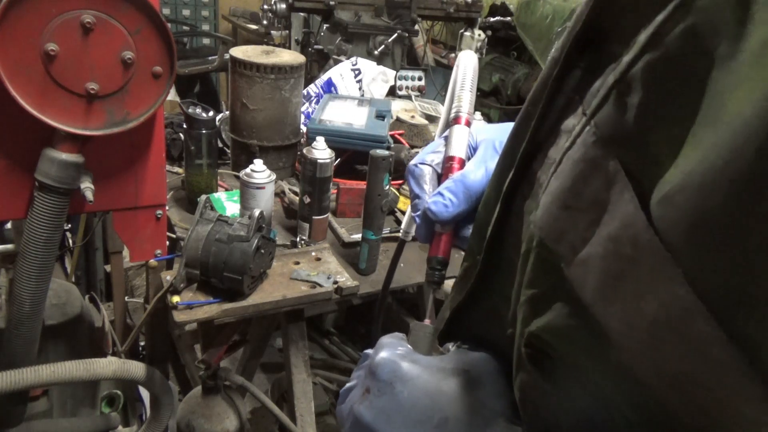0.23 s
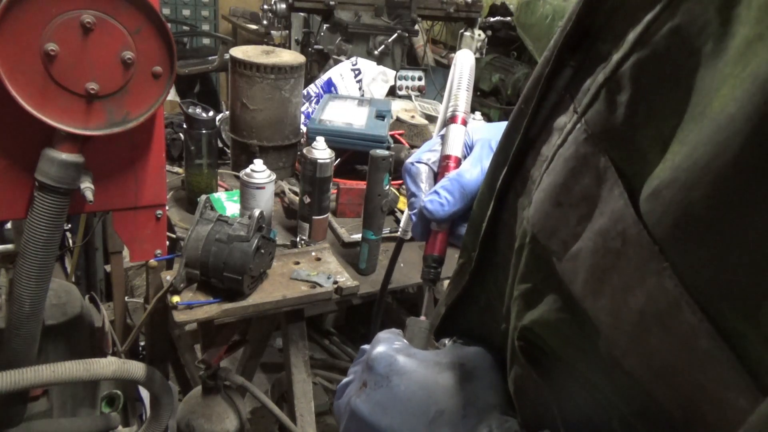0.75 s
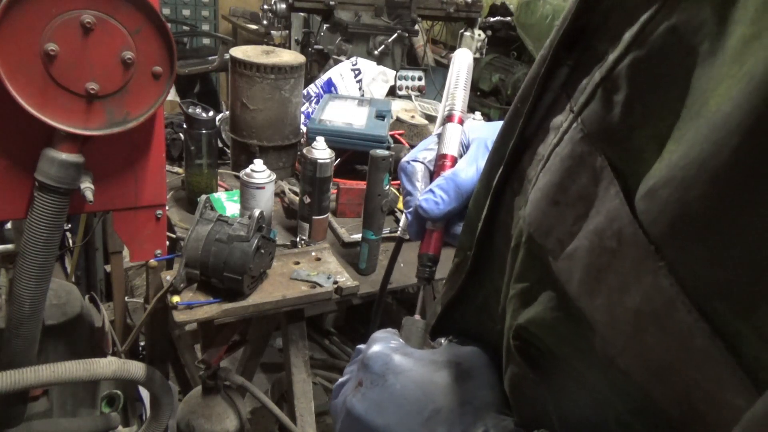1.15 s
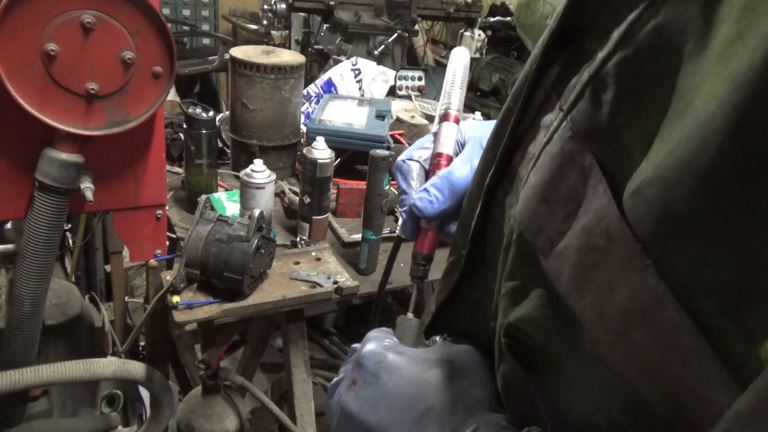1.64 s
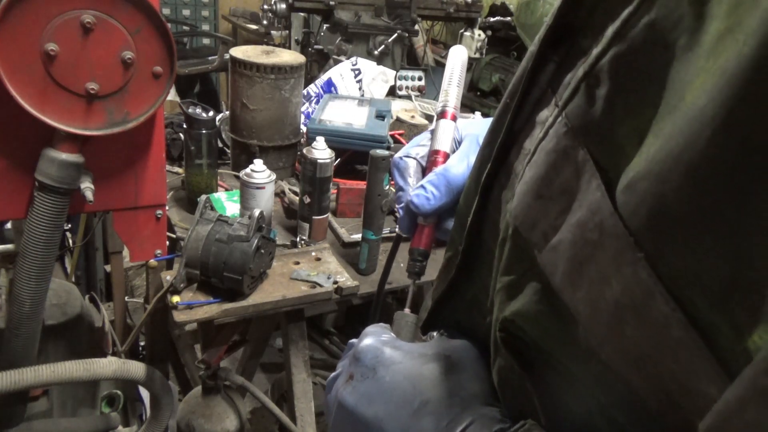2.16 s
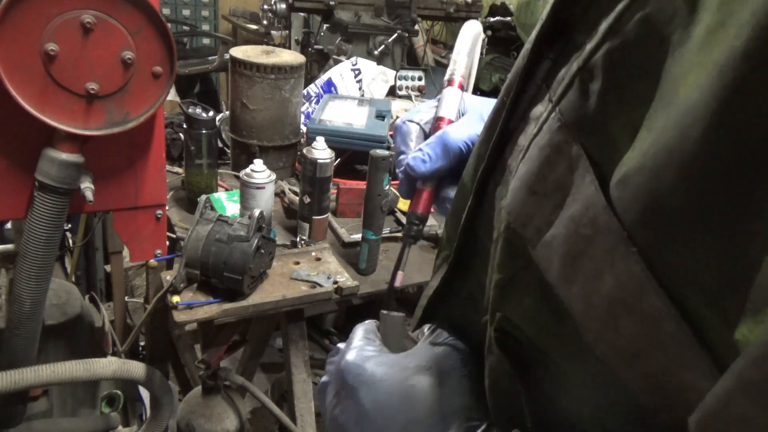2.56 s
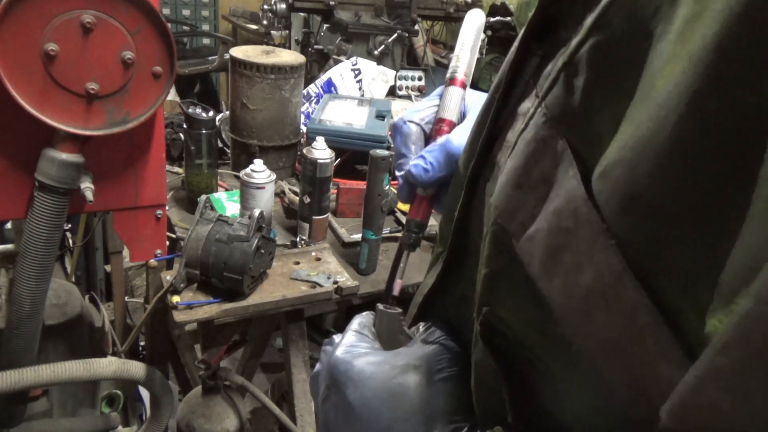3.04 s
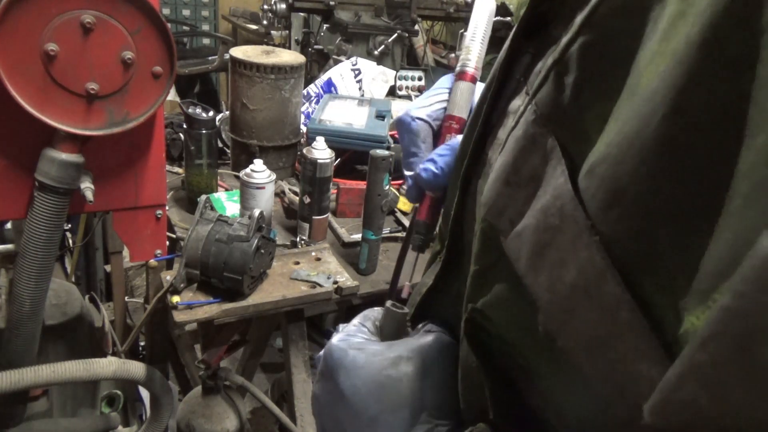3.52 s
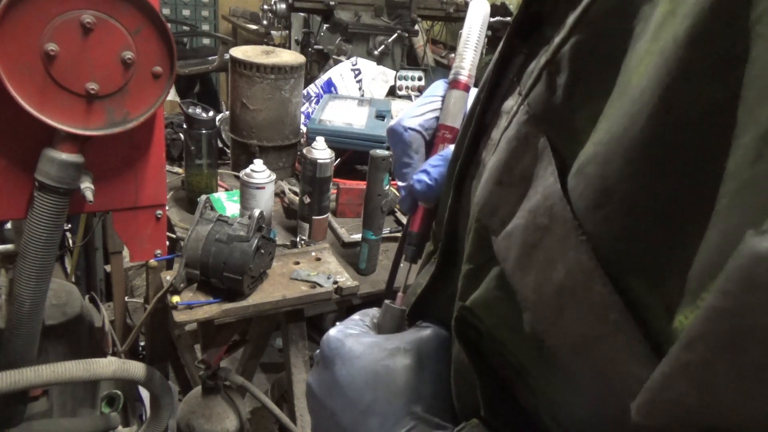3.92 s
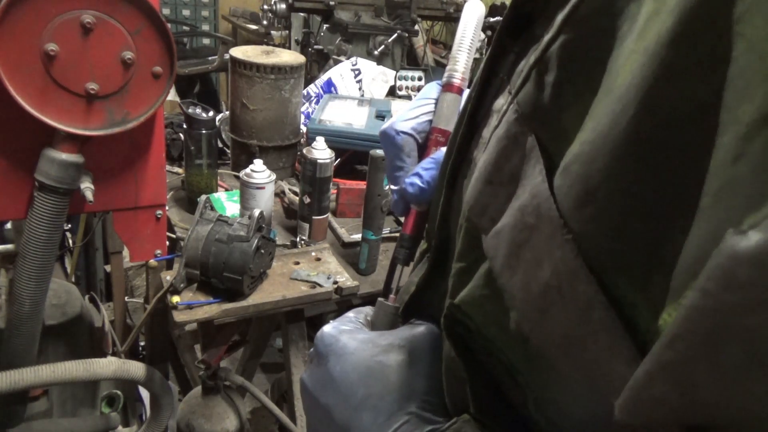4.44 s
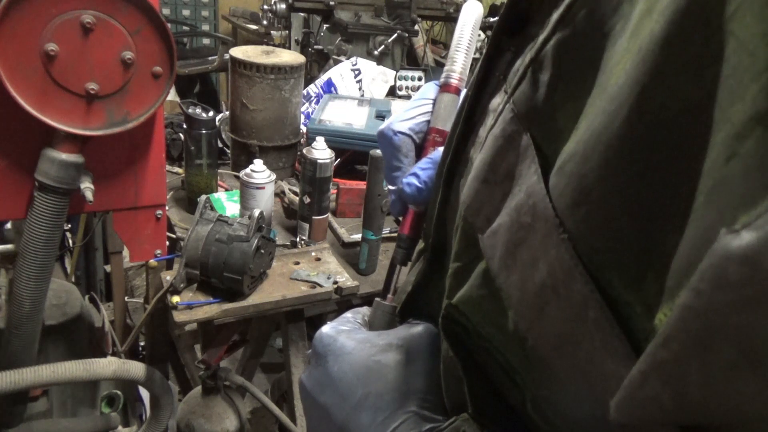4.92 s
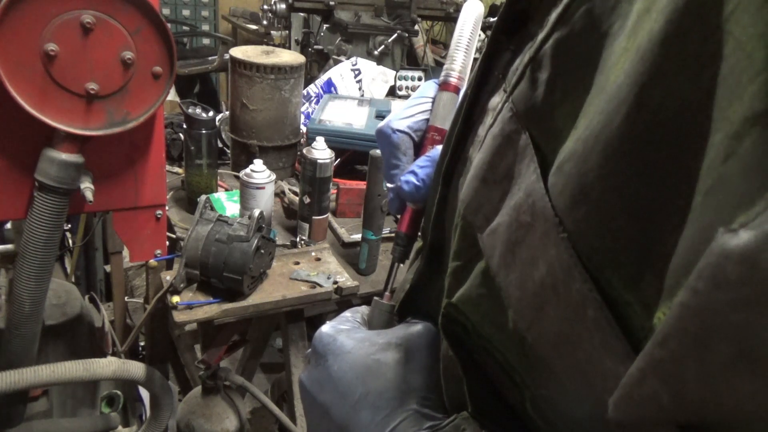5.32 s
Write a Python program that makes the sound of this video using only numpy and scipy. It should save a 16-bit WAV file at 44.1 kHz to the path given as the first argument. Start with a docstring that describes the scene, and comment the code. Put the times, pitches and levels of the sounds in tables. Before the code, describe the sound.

Close, piercing whine of a pneumatic hand grinder with airy hiss, rough squeals under load, a clean whistling spell, then more grinding.

```python
"""A hand-held air-powered grinder spins at about 37000 turns a minute, over a faint workshop rumble.
At first its burr is pressed on a small metal part: the shaft hum sags under load, the part squeals in bursts.
From about 2.3 s the burr is lifted and a bearing tone whistles; at 4 s it is pressed on again, until the end.
Throughout, shaft and bearing tones follow the speed, filtered noise makes the air hiss, the bearings scream
near 8 kHz, and a limiter holds the peaks."""
import sys
import numpy as np
from scipy import signal
from scipy.fft import rfft, irfft, next_fast_len
from scipy.io import wavfile
from scipy.ndimage import uniform_filter1d, minimum_filter1d

SR = 44100
rng = np.random.default_rng(int(sys.argv[2]) if len(sys.argv) > 2 else 0)


def to_wav(s):
    """Save 16-bit WAV."""
    ch = np.atleast_2d(s).T  # columns
    pcm = np.round(np.clip(ch, -1, 1) * 32767)  # PCM
    wavfile.write(sys.argv[1], SR, pcm.astype(np.int16))


N = 245637

# In these tables "free", "first cut" and "second cut" are three settings that blend as the burr bites.
# Levels are starting levels: load, wander and the level control of the treble act on them later.

# noise of the shop: (frequency [Hz], relative level [dB per Hz])
RUMBLE_COLOUR = [(25, -25), (60, -5.5), (130, -5), (240, 2), (320, 0), (430, -4.5), (560, -0.5), (730, -42)]
# the low background swells a little: (time [s], level [dB])
RUMBLE_SWELL = [(0, -57), (2.2, -57), (2.85, -54.8), (3.2, -56.6), (5.57, -56.5)]
# the tool drifts towards the middle: (time [s], share of the left-right difference [0-1])
OFF_CENTRE = [(0, .29), (2.9, .32), (4.1, .16), (5.57, .1)]
# left-right balance of the tool at full share: (frequency [Hz], left minus right [dB])
BALANCE = [(200, 0), (650, 2), (1290, 0), (2380, -3), (4400, -1.5), (8100, -4), (15000, -.5)]

# spindle speed, which sags with the pressure of the hand: (time [s], speed [turns per s])
SPEED = [(0.05, 629.1), (0.44, 627.0), (0.52, 619.8), (0.84, 620.9), (0.9, 613.5), (0.97, 619.1),
         (1.11, 606.1), (1.17, 605.4), (1.2, 620.7), (1.25, 628.7), (1.72, 609.9), (1.86, 618.8),
         (2.2, 609.8), (2.31, 621.1), (2.39, 637.0), (4.03, 637.4), (4.12, 627.8), (4.42, 611.6),
         (4.54, 616.2), (4.8, 597.9), (4.85, 608.8), (5.0, 607.3), (5.03, 613.1), (5.5, 597.9)]
FREE_TURNS_PER_S = 637
LOAD_SAG_PERCENT = 3.76   # the load nears its full value beyond this loss of speed
# the burr is pressed on the part: (start [s], length [s], time to bite [s])
CUTS = [(-0.1, 2.372, .05), (4.002, 1.7, .1)]
LIFT_S = 0.055   # the burr leaves the metal this quickly
# the burr skates over the metal and its buzz changes: (start [s], length [s], depth [0-1])
SKATES = [(-.05, 0.27, 0.8), (0.53, 0.043, 0.1), (0.974, .05, 0.05), (1.36, 0.067, 0.3), (4.27, 0.18, 0.98),
          (4.495, 0.12, 1), (4.686, 0.12, 0.57), (4.96, 0.043, .8), (5.2, .16, 0.52)]
SKATE_EDGE_S = 0.045
# the burr briefly skips off the metal: middle of the skip and about half its length
SKIP_S, SKIP_HALF_LENGTH_S = 1.21, 0.022

# air and grinding hiss, coloured by the tool's resonances:
# (frequency [Hz], free [dB per Hz], first cut [dB per Hz], second cut [dB per Hz])
HISS = [(800, -87, -90, -94), (1300, -84, -81, -82), (2200, -83, -84, -84), (3100, -80, -76, -80),
        (4000, -82, -81, -82), (5800, -77, -79, -78), (6800, -69, -69, -67), (7700, -52, -51, -50),
        (8500, -64, -60, -58), (9300, -69, -67, -69), (10100, -59, -57, -61), (11300, -64, -63, -64),
        (12200, -73, -64, -67), (13100, -65, -66, -73), (14200, -74, -72, -77), (15400, -77, -75, -77)]
# rise and fall of the hiss: (time [s], gain [dB])
AIR = [(0, 3), (.5, 1), (1.1, 2), (1.9, 1.5), (2.5, 2.5), (2.87, 4), (3.55, -0.1), (4.2, 1), (4.65, 2.5),
       (5.2, 0.5), (5.57, 4.5)]
# ball and cage tones, mostly between the whole multiples:
# (multiple of the speed, free [dB], first cut [dB], second cut [dB])
BEARING = [(2.115, -47, -50, -52), (4.46, -56, -62, -75), (8.67, -49, -53, -57), (10.03, -42, -57, -49),
           (11.42, -39, -44, -52), (11.64, -33, -42, -43), (11.83, -30, -39, -40), (12.2, -30, -28, -34),
           (12.42, -28, -26, -26), (12.64, -35, -32, -28), (12.81, -30, -24, -25), (13.03, -32, -39, -34),
           (13.19, -41, -36, -35), (13.42, -38, -35, -32), (13.8, -51, -46, -39), (14.16, -47, -39, -39),
           (15.33, -39, -60, -62), (15.56, -33, -44, -52), (15.78, -35, -39, -42), (15.94, -39, -42, -43),
           (16.17, -33, -28, -29), (16.34, -44, -37, -35), (16.56, -40, -36, -41), (16.78, -44, -37, -41),
           (17.17, -45, -41, -45), (17.56, -39, -40, -47), (17.78, -40, -40, -46), (18.17, -40, -34, -38),
           (18.35, -51, -44, -46), (19.8, -55, -47, -55), (20.17, -58, -44, -49), (20.32, -38, -39, -52),
           (20.7, -40, -44, -52), (21.12, -41, -42, -45), (21.7, -48, -52, -51)]
# one bearing tone sits on the tool's main resonance and whistles: (start [s], length [s], level [dB])
WHISTLES = [(2.36, 0.46, -23), (2.98, 1.18, -18.5), (3.6, 0.215, -13.5)]
WHISTLE_MULTIPLE, WHISTLE_IDLE_DB = 12.03, -29
WHISTLE_ATTACK_S, WHISTLE_RELEASE_S = 0.036, 0.037
# higher multiples of the speed: (multiple of the speed, free [dB], first cut [dB], second cut [dB])
OVERTONES = [(7, -56, -48, -50), (8, -52, -45, -47), (9, -51, -52, -48), (10, -54, -49, -41),
             (11, -37, -43, -40), (13, -44, -31, -26), (14, -44, -35, -30), (15, -48, -42, -39),
             (16, -51, -34, -35), (17, -42, -34, -39), (18, -44, -33, -35), (19, -55, -37, -38),
             (20, -42, -35, -42), (21, -48, -37, -41), (22, -60, -46, -47), (23, -58, -48, -46)]

# the caught burr bounces on the part: (start [s], length [s], strength of each knock [dB])
CATCHES = [(.535, .026, -30), (4.62, .007, -26)]
# ringing of the part, damped by the glove: (frequency [Hz], width [Hz], relative level [dB])
PART_MODES = [(1540, 250, -1), (3100, 500, 0), (4300, 900, -4)]
# unbalance and tooth strikes: (multiple of the speed, free [dB], first cut [dB], second cut [dB],
# change at full load [dB], change in a full skate [dB], wander in the cut [dB], roughness [0-1])
SHAFT_TONES = [(1, -37, -32, -31.5, -10, 1, 0.2, 0.17), (2, -43.5, -38, -36, 6.5, -2, 1.5, 0.19),
               (3, -46, -51, -48, 10.5, -12.5, 3, 0.28), (4, -59, -43, -37, -5.5, -10, 2.5, 0.29),
               (6, -42.5, -41, -40.5, 1.5, -2, 0.8, 0.37)]
# the fifth multiple meets a resonance of the part: (start [s], length [s], level [dB], roughness [0-1])
SQUEALS = [(-0.02, 0.33, -27, 0.1), (0.233, 0.054, -24, 0.3), (0.293, 0.1, -35.5, 0.2),
           (0.47, 0.063, -28, 0.3), (0.815, 0.064, -31, 0.4), (1.04, 0.2, -33, 0.72),
           (1.272, 0.043, -24, 0.2), (1.309, 0.066, -31, 0.2), (1.688, 0.028, -33, 0.86),
           (1.813, 0.11, -33.5, 0.63), (2.133, 0.035, -31, 0.4), (2.266, 0.024, -29, 0.1),
           (4, 0.094, -32, 0), (4.42, 0.062, -41, .3), (4.61, 0.073, -35, .8), (4.742, 0.15, -42, 0.9),
           (5.337, 0.12, -40, 0.2), (5.491, 0.032, -31.5, 0)]
SQUEAL_ATTACK_S, SQUEAL_RELEASE_S = 0.018, 0.036
# steady fifth multiple under the squeals: (free [dB], first cut [dB], second cut [dB])
SQUEAL_IDLE = [-61, -40.5, -48.5]
# a squeal drags other multiples along: (multiple of the speed, level relative to the squeal [dB])
SQUEAL_PARTNERS = [(7, -24), (8, -23)]
SQUEAL_FOURTH_DB = -16   # what a squeal adds to the fourth multiple, relative to the squeal

# the scream near 8 kHz, before the whistle adds to it: (free [dB], first cut [dB], second cut [dB])
SCREAM = [-17.5, -17, -15.5]
# treble above the scream, before a final lift of 2 dB: (time [s], level [dB])
RASP = [(0, -20), (.9, -23.5), (1.55, -22), (1.9, -20.5), (2.3, -22), (2.65, -25.5), (2.95, -24.5),
        (3.4, -25), (4.05, -26.5), (4.3, -23), (4.9, -25), (5.57, -25)]
SCREAM_LOW_HZ, RASP_LOW_HZ = 6500, 9200   # where the scream and the treble above it begin
# the hum, everything of the low tones below HUM_TOP_HZ, dips for a while as the tool runs free
HUM_DIP_S, HUM_DIP_LENGTH_S, HUM_DIP_EDGE_S, HUM_DIP_DB, HUM_TOP_HZ = 3.39, 0.686, 0.069, -4.5, 1600
CUTOFF_HZ = 15750   # nothing is heard above this


def from_db(db):
    """Turn decibels into a gain."""
    return 10 ** (np.asarray(db) / 20)


def rms_one(x):
    """Scale to an average (rms) strength of 1."""
    return x / np.sqrt(np.mean(x ** 2) + 1e-20)


def in_time(rows):
    """Join the points of a table that starts with time: one curve for each further column."""
    s, *columns = np.transpose(rows)
    return [np.interp(np.arange(N) / SR, s, column) for column in columns]


def at_hz(points, hz, column=1):
    """Read a table of frequencies, with pitch spaced evenly as the ear hears it."""
    points = np.array(points)
    return np.interp(np.log(hz + 1), np.log(points[:, 0]), points[:, column])


def shaped(x, gain_at):
    """Filter a sound with a gain for each frequency."""
    size = next_fast_len(N + 4096)
    hz = np.arange(size // 2 + 1) * SR / size
    return irfft(rfft(x, size) * gain_at(hz), size)[..., :N]


def drift(rate):
    """Smooth random wandering of spread 1 that changes about rate times a second."""
    step = 40   # work on every 40th sample, then join the points
    r = np.exp(-2 * step * np.pi * abs(rate) / SR)
    noise = rng.standard_normal(N // step + 2002)
    slow = signal.lfilter([1], [1, -2 * r, r * r], noise)[2000:]   # let the filter settle first
    return np.interp(np.arange(N) / step, np.arange(len(slow)), rms_one(slow))


def gate(start, length, attack_s, release_s):
    """Rise from the start, hold until the length is over, then fall: 0-1."""
    s = np.arange(N) / SR - start
    return np.clip(np.minimum(s / attack_s, 1 - (s - length) / release_s), 0, 1)


def held_at(x, level_db, window_s):
    """Make the running level of a sound follow a curve."""
    power = uniform_filter1d(x ** 2, max(int(window_s * SR), 2))
    return x * from_db(level_db) / np.sqrt(power + 1e-12)


def tone(angle, rough, flutter_hz):
    """A sine of rms 1 and random phase; its rough share flutters in strength and phase."""
    rough = np.clip(rough, 0, 1)
    along = np.sqrt(2 * (1 - rough ** 2)) + rough * drift(flutter_hz)
    across = rough * drift(flutter_hz)
    angle = ((angle + 2 * np.pi * rng.random()) % (2 * np.pi)).astype(np.float32)
    return along * np.cos(angle) + across * np.sin(angle)


def partials(table, angle, shares, rough, flutter_hz):
    """Tones tied to the speed, each moving between its free and cutting levels as the burr bites."""
    out = np.zeros(N)
    for multiple, *levels_db in table:
        out += (from_db(levels_db) @ shares) * tone(multiple * angle, rough, flutter_hz)
    return out


def shop_rumble():
    """Low noise of the shop, as a middle and a left-right part; long waves reach both sides alike."""
    noise = rng.standard_normal((2, N))
    shop = shaped(noise, lambda hz: from_db(at_hz(RUMBLE_COLOUR, hz)) / (1 + (hz / 700) ** 10))
    middle, side = from_db(in_time(RUMBLE_SWELL)[0]) * rms_one(shop)
    return middle, shaped(side, lambda hz: hz / 3800)


def side_scatter(x, level_db, t60, count=60):
    """Faint, scattered delayed copies, weaker when later and different on each side, widen the sound a little."""
    delays = rng.uniform(0.0025, 0.064, (2, count))
    copies = np.zeros((2, int(delays.max() * SR) + 1))
    for side, delay in zip(copies, delays):
        side[(delay * SR).astype(int)] = rng.standard_normal(count) * from_db(-60 * delay / t60)
    copies /= np.linalg.norm(copies, axis=1, keepdims=True)
    return from_db(level_db) * signal.fftconvolve(x[None], copies, axes=1)[:, :N]


def hiss(angle, shares):
    """Air rushing through the tool, joined in the cut by scraping that pulses once a turn."""
    contact = 1 - shares[0]
    noise = rng.standard_normal(N) * np.sqrt(SR / 2)   # 0 dB per Hz
    noise = noise * (1 + 0.4 * contact * np.cos(angle)) * from_db(1.2 * drift(rate=150))
    noise = shaped(noise, lambda hz: hz ** 3 / (hz ** 3 + 560 ** 3))   # a thin jet has no bass
    noise = shaped(noise, lambda hz: from_db(np.interp(hz, [12000, 15500], [0, 2.2])))   # and a bright top
    colours = [shaped(noise, lambda hz: from_db(at_hz(HISS, hz, column=k + 1))) for k in range(len(shares))]
    air_db, = in_time(AIR)
    return from_db(air_db) * np.sum(np.sqrt(shares) * colours, axis=0)


def whistle_strength():
    """How strongly the bearing whistle sounds over time; the strongest entry prevails."""
    each = [from_db(db) * gate(start, length, WHISTLE_ATTACK_S, WHISTLE_RELEASE_S)
            for start, length, db in WHISTLES]
    return np.max(each, axis=0)


def bearings(angle, shares, whistling):
    """The ball cage slips a little, more under side load, so that all its tones waver together."""
    contact = 1 - shares[0]
    slipping = angle + (0.02 + 0.025 * contact) * drift(rate=12)
    whistle = tone(WHISTLE_MULTIPLE * slipping, rough=0.3 + 0.3 * contact, flutter_hz=20)
    whistle = np.maximum(whistling, from_db(WHISTLE_IDLE_DB)) * whistle
    return whistle + partials(BEARING, slipping, shares, rough=0.42 + 0.25 * contact, flutter_hz=17)


def catches(angle):
    """A caught burr knocks on the part every second turn, and the part rings briefly."""
    knocks = np.diff(angle // (4 * np.pi), prepend=0)
    s = np.arange(N) / SR
    force = sum(from_db(db) * ((s >= start) & (s < start + length)) for start, length, db in CATCHES)
    out = np.zeros(N)
    for hz, width, db in PART_MODES:
        r, w = np.exp(-np.pi * width / SR), 2 * np.pi * hz / SR
        ringing = [0, np.sin(w)], [1, -2 * r * np.cos(w), r * r]
        out += from_db(db) * signal.lfilter(*ringing, knocks * force + 1e-18)
    no_bass = signal.butter(2, 1300, "high", fs=SR, output="sos")   # so small a part radiates no bass
    return signal.sosfilt(no_bass, out)


def spindle(angle, shares, load, squealing):
    """Hum of the shaft: load trades unbalance for tooth strikes, which wander as the burr moves."""
    s = np.arange(N) / SR
    biting = 1 - np.exp(-((s - SKIP_S) / SKIP_HALF_LENGTH_S) ** 4)
    skating = sum(depth * gate(start, length, SKATE_EDGE_S, SKATE_EDGE_S) for start, length, depth in SKATES)
    out = np.zeros(N)
    for multiple, *levels_db, load_db, skate_db, wander_db, rough in SHAFT_TONES:
        wander = wander_db * (1 - shares[0]) * np.tanh(drift(rate=15))
        change_db = load_db * load + skate_db * skating + wander
        level = (from_db(levels_db) @ shares) * from_db(change_db)
        if multiple == 4:
            level = np.hypot(level, from_db(SQUEAL_FOURTH_DB) * squealing)
        if multiple in (2, 3, 4):   # these vanish while the burr skips
            level = level * biting
        out += level * tone(multiple * angle, rough, flutter_hz=15)
    return out


def squeals():
    """Strength and roughness of the part's squealing over time; the strongest squeal prevails."""
    each = np.array([from_db(db) * gate(start, length, SQUEAL_ATTACK_S, SQUEAL_RELEASE_S)
                     for start, length, db, _ in SQUEALS])
    roughness = np.array(SQUEALS)[:, -1]
    return each.max(axis=0), roughness @ each / (each.sum(axis=0) + 1e-12)


def chatter(angle, shares, squealing, squeal_rough):
    """The part sings faintly and unsteadily at the fifth multiple, and loudly when a squeal locks in."""
    fifth = 5 * angle
    out = (from_db(SQUEAL_IDLE) @ shares) * tone(fifth, rough=0.61, flutter_hz=35)
    out += squealing * tone(fifth, squeal_rough, flutter_hz=39.7)
    for multiple, db in SQUEAL_PARTNERS:
        out += from_db(db) * squealing * tone(multiple * angle, rough=0.39, flutter_hz=22)
    return out


def grinder():
    """All parts of the tool follow one turning angle; each cut changes their colour and loads the shaft."""
    speed, = in_time(SPEED)
    angle = 2 * np.pi * np.cumsum(speed) / SR
    first_cut, second_cut = [gate(start, length, bite_s, LIFT_S) for start, length, bite_s in CUTS]
    shares = np.clip([1 - first_cut - second_cut, first_cut, second_cut], 0, 1)
    contact = 1 - shares[0]
    sag_percent = 100 * (1 - speed / FREE_TURNS_PER_S)
    load = contact * np.tanh(sag_percent / LOAD_SAG_PERCENT)
    whistling = whistle_strength()
    squealing, squeal_rough = squeals()

    overtones = partials(OVERTONES, angle, shares, rough=0.55, flutter_hz=12)
    tones = overtones + bearings(angle, shares, whistling)
    air = hiss(angle, shares)

    # below the scream: in the cut these tones come and go
    surge = from_db(1.5 * contact * drift(rate=6.6) + 0.39 * shares[0])
    middle_tones = surge * shaped(tones, lambda hz: hz < SCREAM_LOW_HZ)
    low_tones = spindle(angle, shares, load, squealing) + middle_tones
    dip = from_db(HUM_DIP_DB * gate(HUM_DIP_S, HUM_DIP_LENGTH_S, HUM_DIP_EDGE_S, HUM_DIP_EDGE_S))
    low_tones = low_tones + (dip - 1) * shaped(low_tones, lambda hz: hz < HUM_TOP_HZ)
    body = low_tones + from_db(-0.37) * shaped(air, lambda hz: hz < SCREAM_LOW_HZ)

    # the scream: the whistle lifts its level
    scream = shaped(tones + air, lambda hz: (hz >= SCREAM_LOW_HZ) & (hz < RASP_LOW_HZ))
    scream_db = 20 * np.log10(np.hypot(from_db(SCREAM) @ shares, whistling))
    scream = held_at(scream, scream_db + 0.76 * drift(rate=8.2), window_s=0.075)

    # the rasp above it: the teeth grip unevenly
    bite = from_db(1.53 * drift(rate=32) * contact)
    rasp = shaped(tones * bite * from_db(3) + air, lambda hz: hz >= RASP_LOW_HZ)
    rasp_db, = in_time(RASP)
    rasp = from_db(2.0) * held_at(rasp, rasp_db + 1.1 * drift(rate=14), window_s=0.33)
    return chatter(angle, shares, squealing, squeal_rough) + catches(angle) + body + scream + rasp


def scene():
    """The tool close by and slightly to the right, over the low noise of the shop."""
    shop_middle, shop_side = shop_rumble()
    tool = grinder()
    # half the left-right difference, as a share of the middle
    tool_side = shaped(tool, lambda hz: np.tanh(np.log(from_db(at_hz(BALANCE, hz))) / 2))
    side = tool_side * in_time(OFF_CENTRE)[0] + shop_side
    left_right = side * [[1], [-1]]
    return tool + shop_middle + left_right + side_scatter(tool, level_db=-21.5, t60=1.0)


def limiter(x, ceiling_db, hold_s):
    """The gain dips smoothly around every peak that would pass the ceiling."""
    size = max(int(hold_s * SR), 2)
    allowed = np.minimum(1, from_db(ceiling_db) / (np.abs(x).max(axis=0) + 1e-9))
    return x * uniform_filter1d(minimum_filter1d(allowed, size), size)


def record(dry):
    """Peaks are held down and the top is cut steeply."""
    held = limiter(dry, ceiling_db=-6.0, hold_s=0.0056)
    return shaped(held, lambda hz: np.clip((CUTOFF_HZ - hz) / 100 + 0.5, 0, 1))


dry = scene()
out = record(dry)
to_wav(out)
```